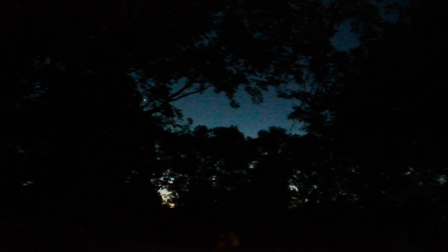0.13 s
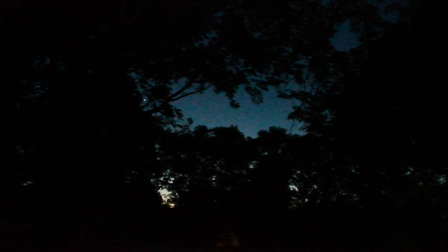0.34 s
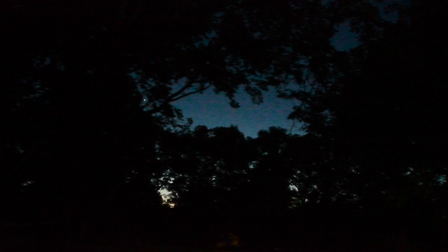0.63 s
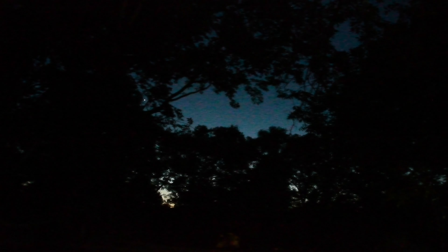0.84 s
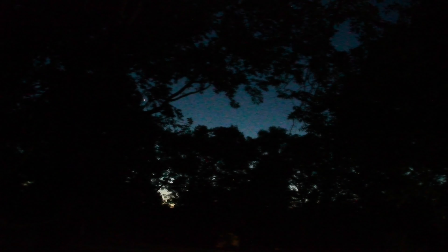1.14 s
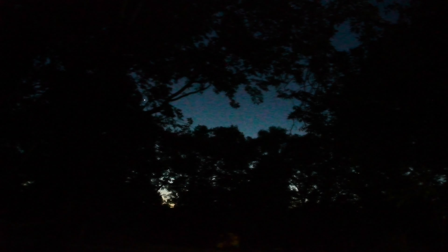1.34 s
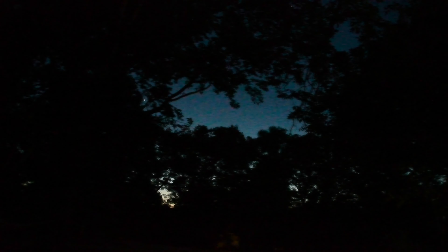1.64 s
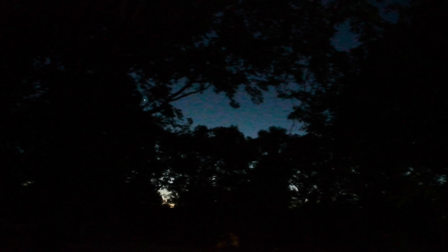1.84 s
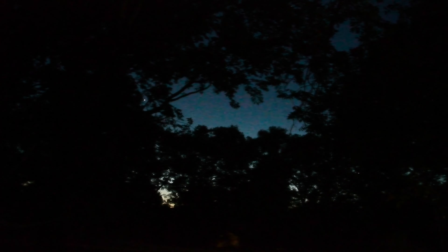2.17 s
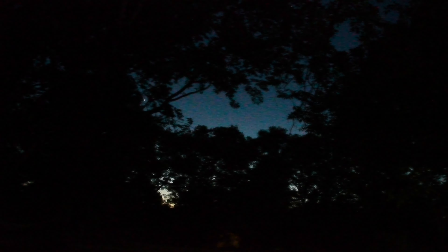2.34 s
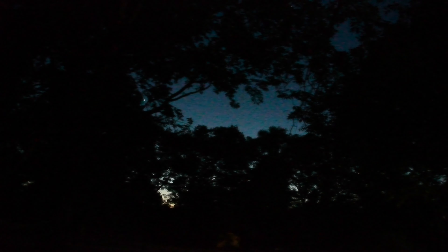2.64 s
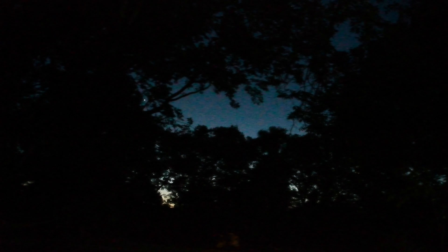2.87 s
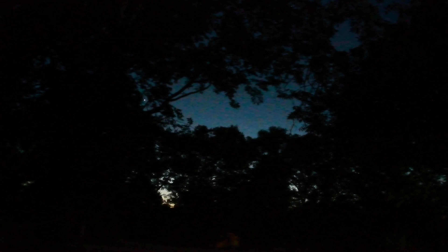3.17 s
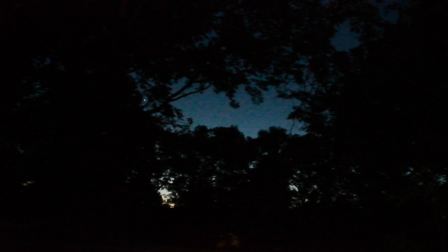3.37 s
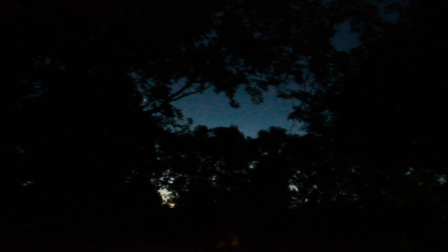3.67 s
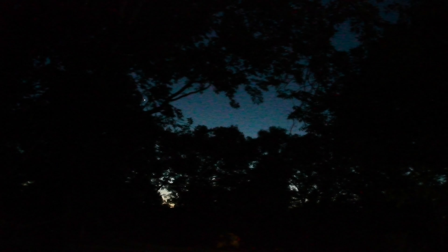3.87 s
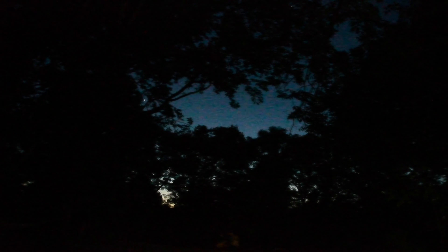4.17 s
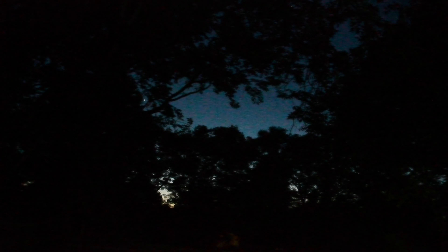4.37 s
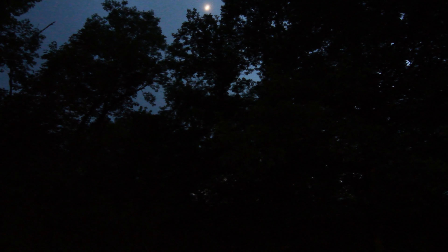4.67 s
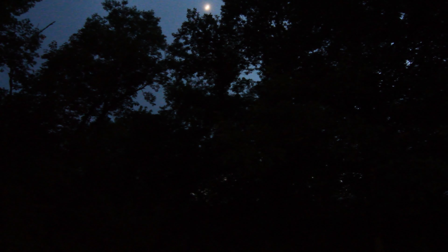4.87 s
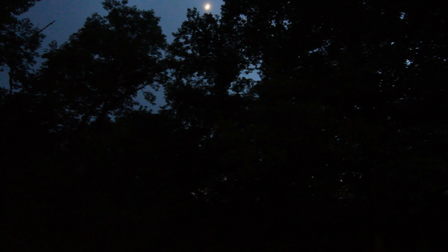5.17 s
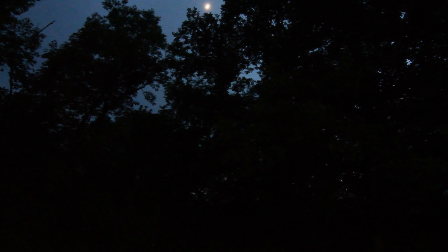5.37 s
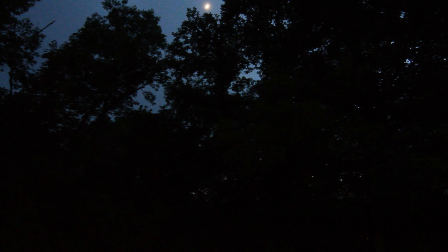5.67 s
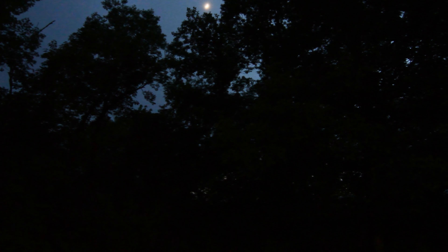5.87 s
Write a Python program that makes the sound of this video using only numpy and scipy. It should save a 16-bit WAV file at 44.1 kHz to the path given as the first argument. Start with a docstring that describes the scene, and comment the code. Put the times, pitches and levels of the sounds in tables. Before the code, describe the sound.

From the start, a cricket holds a high, rapid trill near the center of a backyard at night, backed by quieter crickets and the steady hiss of a distant chorus. Other crickets add short, higher chirps, a few each second. Far tree frogs give lower, pulsing calls from the right, at about 0.2 to 1.1 seconds, more faintly around 2 seconds, and again from 3 to 4 seconds. A thin whine and a low rumble are barely audible underneath. At about 4.6 seconds the sound cuts abruptly to another spot in the yard. A single lower, slightly louder cricket trills steadily to the left, the background chorus becomes fuller in the frogs' range, and the high chirps thin out. Tree frog calls are now louder and overlap, mostly on the right, with the strongest from about 5.6 seconds to the end, just after 6 seconds.

```python
"""Crickets trill over the hiss of a far, blurred chorus in a backyard at night, with a faint whine and rumble.
Each wing stroke scrapes out one pulse of falling pitch; ground crickets chirp higher up in short bursts.
Tree frogs call from far trees through pulsing vocal sacs, and leaves scatter every trill and call.
At MOVE_S the listener cuts to a second spot in the yard, with its own singers and chorus."""
import sys
import numpy as np
from scipy import signal
from scipy.fft import rfft, irfft, next_fast_len
from scipy.io import wavfile
from scipy.ndimage import uniform_filter1d, map_coordinates

SR = 44100
rng = np.random.default_rng(int(sys.argv[2]) if len(sys.argv) > 2 else 0)


def master_out(mix):
    """Clip the mix to full scale and print it as 16-bit PCM to the path in sys.argv[1]."""
    frames = np.transpose(np.atleast_2d(mix))
    ceiling = np.clip(frames, -1, 1)
    pcm = np.round(ceiling * 32767).astype(np.int16)
    wavfile.write(sys.argv[1], SR, pcm)


N = 265041
MOVE_S, CROSSFADE_S = 4.577, .004

# Drifting tempo of the first lead cricket: time_s, strokes_per_s
LEAD_TEMPO = [(0, 76.2), (1.7, 76.1), (2.2, 76.8), (2.75, 77.6), (3.4, 77.3), (4, 76.9), (4.6, 76.8)]
# Wing pulse of each spot's lead cricket; pan is always left minus right:
# end_pitch_hz, fall_ratio, length_s, level_db, pan_db, left_lag_s, echo_db, overtone_db, overtone_pan_db
FIRST_LEAD = (5610, .068, .0075, -38, 1.8, .000174, -35, -33, 2)
SECOND_LEAD = (4915, .056, .0063, -34.8, 5.5, .000204, -42, -19.5, -8)
# The first spot's quieter crickets:
# strokes_per_s, end_pitch_hz, length_s, level_db, pan_db, left_lag_s, echo_db
BACKING_CRICKETS = [(56.8, 4820, .0087, -61, -18, -.0002, -61), (72.4, 5850, 0.0062, -56, -1, -.0001, -46),
                    (81.7, 5580, .0097, -45, 0, .00012, -44.5),
                    (115.4, 6120, 0.0054, -51.5, 1, .0002, -47.5),
                    (71.8, 5120, .007, -58.5, -9, -.0002, -61)]
# Tone colour of the far chorus and night air at each spot: frequency_hz, relative_db
FIRST_BED = [(25, -60), (60, -52), (120, -39.5), (200, -39.5), (330, -31.5), (520, -32), (1300, -16.5),
             (4350, -20.5), (5100, -4.5), (5800, -2), (6500, -11), (7300, -16), (8400, -23), (15700, -26)]
SECOND_BED = [(25, -62), (120, -36), (280, -32), (520, -25), (1300, -9), (1850, -16), (2350, -2.5),
              (3100, -17), (4450, -17), (5100, 1), (5800, -5.5), (7000, -13), (8200, -20.5), (15700, -23)]
# Stereo width of the noise: frequency_hz, left_right_correlation
STEREO_LIKENESS = [(60, .85), (130, 0.95), (290, 1), (640, 0.63), (1400, -0.026), (3100, -0.19),
                   (5800, 0.22), (8000, -0.032)]
# Low swells of rumble: start_s, hold_s, level_db
RUMBLE_SWELLS = [(.1, .25, -83), (1.8, 0.17, -75), (2.1, 0.13, -77), (2.98, .1, -82), (3.36, .07, -80),
                 (3.747, .19, -73)]
# Ground cricket chirps: start_s, pitch_hz, level_db, pan_db
GROUND_CHIRPS = [(0, 7430, -53, -6), (.104, 6670, -48.5, 5), (.263, 7530, -57, -3), (.373, 7200, -53, -2),
                 (.498, 8000, -60, 0), (.63, 7100, -56, -2), (.8, 7250, -51, 0), (1, 7300, -51, -2),
                 (1.06, 6400, -45, 0), (1.33, 7370, -51.5, 0), (1.41, 6640, -48.5, 2),
                 (1.58, 7500, -54, -2), (1.76, 7280, -52, 6), (2.16, 6400, -45.5, 0), (2.25, 7330, -56, -3),
                 (2.537, 7570, -52.5, -1), (2.64, 6770, -51.5, 10), (2.82, 7100, -54, 0),
                 (3.3, 7370, -52, -3), (3.4, 6750, -50, 1), (3.537, 7640, -55.5, 0),
                 (3.76, 7260, -54.5, -3), (3.95, 6680, -48, 6), (4.069, 7370, -50.5, 1),
                 (4.33, 7200, -57, -3), (4.678, 6600, -49, 4), (5.099, 7070, -53.5, 3),
                 (5.566, 6440, -51, 9), (5.715, 6840, -46.5, -8.5)]
# Tree frog calls: start_s, length_s, pitch_hz, level_db, pan_db
FROG_CALLS = [(.17, .63, 2370, -49.5, -8.5), (.299, .84, 2445, -52, -7.5), (1.98, 0.65, 2398, -52.5, -7.5),
              (3.08, .7, 2368, -49.5, -9), (3.299, 0.82, 2427, -50.5, -7), (4.301, .5, 2343, -41, -10),
              (4.401, 0.95, 2387, -48.5, -9), (4.958, .5, 2747, -47, 1), (5.101, .6, 2352, -43.5, -8),
              (5.516, .25, 2690, -53, -8), (5.62, .6, 2322, -37.5, -9), (5.8, .5, 2440, -41, -8)]
USUAL_FROG_HZ = 2381


def amp(db):
    return 10 ** (np.asarray(db) / 20)


def unit_rms(x):
    return x / np.sqrt(np.mean(x ** 2) + 1e-20)


def pan(pan_db):
    """Left and right gains, pan_db apart."""
    return amp(np.array([[.5], [-.5]]) * pan_db)


def curve_at(points, hz):
    """Read (frequency_hz, value) points along a log axis."""
    knots_hz, values = np.transpose(points)
    return np.interp(np.log(hz + 1), np.log(knots_hz + 1), values)


def wobble(rate):
    """Smooth random drift, rate knots a second."""
    return map_coordinates(rng.standard_normal(int(N * rate / SR) + 4), [np.arange(N) * rate / SR])


def eq(x, response):
    """Shape x with a gain for each frequency."""
    size = next_fast_len(N + 8192)
    return irfft(rfft(x, size) * response(np.fft.rfftfreq(size, 1 / SR)), size)[..., :N]


def pulses(times, gains, end_hz, fall, length_s, left_lag_s, multiple, snap):
    """Stereo tone pulses: the pitch snaps down at the onset, then slides to multiple * end_hz."""
    snap_s, tick_s = .0005, .0004
    out = np.zeros((2, N))
    for ear, lag_s in enumerate((left_lag_s, 0)):
        start = (times + lag_s)[:, None] * SR
        index = np.floor(start).astype(int) + np.arange(int(length_s * SR) + 2)
        t = np.clip(index - start, 0, length_s * SR) / SR
        slide = t * (1 + fall) - fall * t * t / (2 * length_s)
        cycles = end_hz * (slide + snap * snap_s * (1 - np.exp(-t / snap_s)))
        body = np.abs(np.sin(np.pi * (t / length_s) ** .7))  # quick attack, slower release
        tick = 1.3 * snap / multiple ** 2 * t / tick_s * np.exp(1 - t / tick_s)  # a scraper catching
        wave = gains[:, None] * (body + tick) * np.sin(2 * np.pi * multiple * cycles)
        inside = (index >= 0) & (index < N)
        out[ear] = np.bincount(index[inside], wave[inside], N)
    return out


def leaf_echo(x, t60_s):
    """Trees and walls scatter the sound into a short tail, different at each ear."""
    t = np.arange(int(t60_s * SR)) / SR
    tail = rng.standard_normal((2, len(t))) * amp(-60 * t / t60_s) * (1 - np.exp(-t / .0034))
    return signal.fftconvolve(x[None], tail / np.linalg.norm(tail[0]), axes=1)[:, :N]


def trill(strokes, end_hz, fall, length_s, level_db, pan_db, lag_s, echo_db, overtone_db,
          overtone_pan_db, snap=.1, swell_db=1.35, jitter_s=.000023):
    """One cricket scraping its wings: a pulse each time the stroke count passes a whole number."""
    times = np.interp(np.arange(np.ceil(strokes[0]), strokes[-1]), strokes, np.arange(len(strokes)) / SR)
    flicker, slip = rng.standard_normal((len(times), 2)).T
    gains = amp(.88 * flicker + swell_db * wobble(3.4)[(times * SR).astype(int)])
    times += jitter_s * slip
    tone, overtone = (pulses(times, gains, end_hz, fall, length_s, lag_s, k, snap) for k in (1, 2))
    overtone *= amp(overtone_db)
    direct = amp(level_db) * (pan(pan_db) * tone + pan(overtone_pan_db) * overtone)
    return direct + amp(echo_db) * leaf_echo(tone[1] + overtone[1], t60_s=.22)


def crickets():
    """Wing trills for both spots: a drifting lead with its backing, then one steady soloist."""
    t = np.arange(N) / SR
    move = round(MOVE_S * SR)
    strokes = .57 + np.cumsum(np.interp(t, *np.transpose(LEAD_TEMPO))) / SR
    first = trill(strokes[:move], *FIRST_LEAD, snap=.071, swell_db=1.2)
    for rate, end_hz, length_s, level_db, pan_db, lag_s, echo_db in BACKING_CRICKETS:
        strokes = np.cumsum(rate + .3 * wobble(.8))[:move] / SR
        first += trill(strokes, end_hz, .035, length_s, level_db, pan_db, lag_s, echo_db,
                       overtone_db=-20.5, overtone_pan_db=pan_db / 2)
    second = trill(66.47 * (t - .0037), *SECOND_LEAD, snap=.26, swell_db=.6, jitter_s=.000036)
    return first, second


def wash(spectrum, patchy_db):
    """Coloured stereo noise at rms 1, its level dappled across time and frequency."""
    bins = signal.stft(rng.standard_normal((2, N)), nperseg=512)[2]
    patches = uniform_filter1d(rng.standard_normal(bins.shape[1:]), 6, axis=0)
    patches = unit_rms(uniform_filter1d(patches, 14, axis=1))
    noise = signal.istft(bins * amp(patchy_db * patches), nperseg=512)[1][:, :N]

    def mid_side_gains(hz):
        width = np.arccos(np.clip(curve_at(STEREO_LIKENESS, hz), -1, 1)) / 2
        return amp(curve_at(spectrum, hz)) * [np.cos(width), np.sin(width)]

    mid, side = eq(noise, mid_side_gains)
    return unit_rms(np.array([mid + side, mid - side]))


def whine(pitch_hz=2864, level_db=-77.5, pan_db=-12):
    """A thin tone to the right, wavering slightly."""
    t = np.arange(N) / SR
    gain = amp(level_db + 1.1 * wobble(3.7))
    return gain * pan(pan_db) * np.sin(2 * np.pi * pitch_hz * t + .6 * wobble(8.7))


def rumble(rest_db=-86.5, attack_s=.04, release_s=.05):
    """A faint low murmur that swells in short bursts."""
    t = np.arange(N) / SR
    gain = amp(rest_db + 3 * wobble(5.97))
    for start_s, hold_s, level_db in RUMBLE_SWELLS:
        corners_s = np.cumsum([start_s, attack_s, hold_s, release_s])
        gain += amp(level_db) * np.interp(t, corners_s, [0, 1, 1, 0])
    return gain * wash([(180, -42), (260, -8), (400, -5), (520, -23)], patchy_db=0)


def far_chorus():
    """Distant singers and night air blur into one bed of hiss for each spot."""
    return amp(-48) * wash(FIRST_BED, patchy_db=.47), amp(-48.5) * wash(SECOND_BED, patchy_db=.1)


def phrase(start_s, length_s, attack_s, release_s, pulses_per_s, jitter_s):
    """Slightly uneven pulse times and gains for one chirp or call, fading in and out."""
    t = np.arange(0, length_s, 1 / pulses_per_s)
    flicker, slip = rng.standard_normal((len(t), 2)).T
    attack = np.minimum(1, (t + 1 / pulses_per_s) / attack_s)
    release = np.minimum(1, (length_s - t) / release_s)
    return start_s + t + jitter_s * slip, attack * release * amp(2 * flicker)


def ground_crickets(chirps, fall=.14):
    """Short chirps of quick, steeply falling wing pulses, scattered by the leaves."""
    direct = np.zeros((2, N))
    for start_s, pitch_hz, level_db, pan_db in chirps:
        times, gains = phrase(start_s, length_s=.16, attack_s=.029, release_s=.029,
                              pulses_per_s=97.7, jitter_s=.00005)
        end_hz = pitch_hz / (1 + fall / 2)
        chirp = pulses(times, gains, end_hz, fall, length_s=.0045, left_lag_s=.0001, multiple=1, snap=.076)
        direct += amp(level_db) * pan(pan_db) * chirp
    return direct + amp(3.5) * leaf_echo(direct.mean(0), t60_s=.28)


def far_frog_calls(every_s=.4, length_s=.596, level_db=-59.5, pan_db=-6):
    """Loosely spaced faint calls behind the first spot, as rows like FROG_CALLS."""
    starts = np.arange(0, MOVE_S, every_s)
    return [(abs(start_s + .08 * slip), length_s, USUAL_FROG_HZ + 60 * detune, level_db + 1.7 * push, pan_db)
            for start_s, (slip, detune, push) in zip(starts, rng.standard_normal((len(starts), 3)))]


def tree_frogs(calls, fall=.12):
    """Vocal sacs pulse at the pitch and near half of it; each call is blurred by its own trees."""
    out = np.zeros((2, 2 * N))
    for start_s, length_s, pitch_hz, level_db, pan_db in calls:
        sharp_hz = pitch_hz - USUAL_FROG_HZ  # smaller frogs call higher and faster
        times, gains = phrase(start_s, length_s, attack_s=.14, release_s=.08,
                              pulses_per_s=51 + .04 * sharp_hz, jitter_s=.000798)
        detune = 1 + .017 * rng.standard_normal((len(times), 1))  # no two pulses quite alike
        sac_hz = pitch_hz / (2 + fall) * detune
        undertone_db = level_db - 15 + .018 * sharp_hz  # higher frogs are fuller near half pitch
        voice = sum(amp(db) * pulses(times, gains, sac_hz, fall, length_s=.0048, left_lag_s=.0002,
                                     multiple=multiple, snap=.01)
                    for multiple, db in ((1.09, undertone_db), (2, level_db)))
        start = round(start_s * SR)
        send = voice[1, start:start + round(length_s * SR) + 400]
        echo = leaf_echo(np.pad(send, (0, SR // 3)), t60_s=.33)
        out[:, :N] += pan(pan_db) * voice
        out[:, start:start + echo.shape[1]] += amp(2) * pan(.49 * pan_db) * echo
    return eq(out[:, :N], lambda hz: 1 / (1 + (850 / (hz + 1)) ** 8))  # the calls carry nothing below about 850 Hz


def scene():
    """Mix each spot with its own singers, then cut from the first to the second."""
    spots = np.array(crickets())
    spots[0] += whine() + rumble()
    spots += far_chorus()
    spots[0] += tree_frogs(far_frog_calls())
    for spot, after_move in zip(spots, (False, True)):
        # A frog call belongs to the spot where it ends, a chirp to the one where it starts.
        spot += tree_frogs([row for row in FROG_CALLS if (row[0] + row[1] > MOVE_S) == after_move])
        spot += ground_crickets([row for row in GROUND_CHIRPS if (row[0] > MOVE_S) == after_move])
    blend = np.clip((np.arange(N) / SR - MOVE_S) / CROSSFADE_S + .5, 0, 1)
    return (1 - blend) * spots[0] + blend * spots[1]


def record(dry):
    """A brick-wall high cut takes off the very top of the hiss."""
    return eq(dry, lambda hz: hz < 15760)


dry = scene()
out = record(dry)
master_out(out)
```